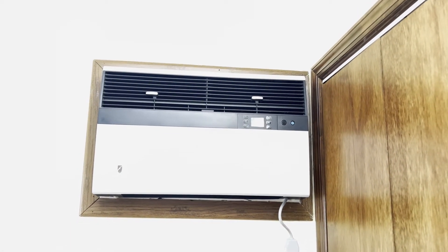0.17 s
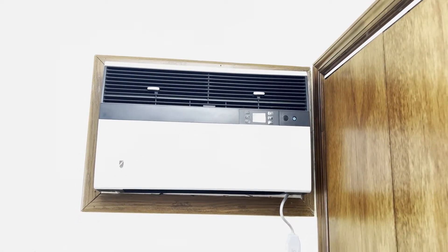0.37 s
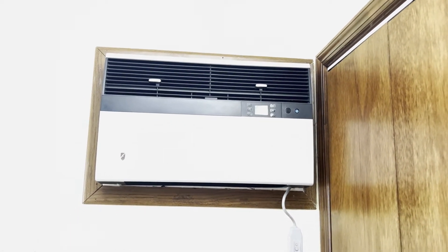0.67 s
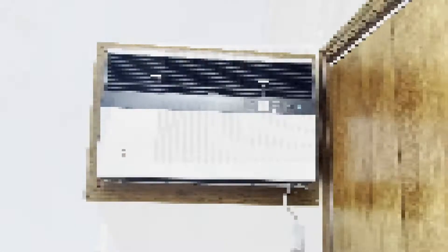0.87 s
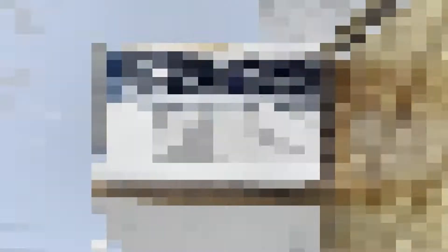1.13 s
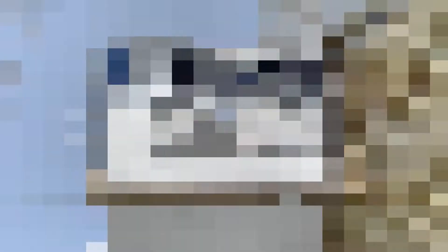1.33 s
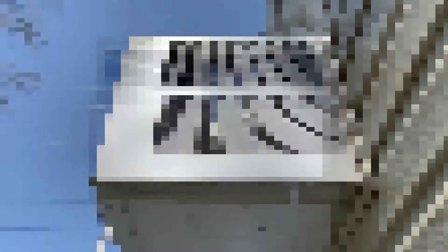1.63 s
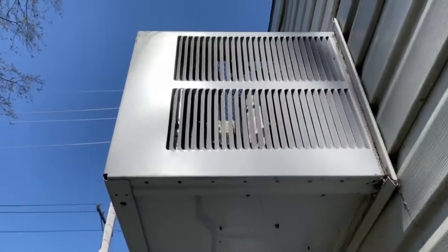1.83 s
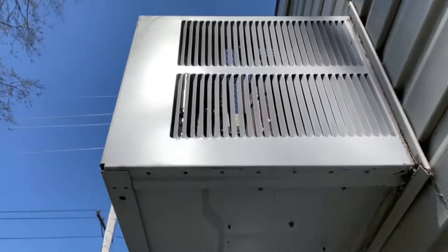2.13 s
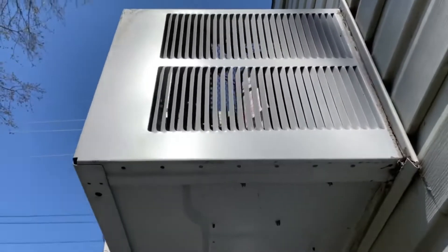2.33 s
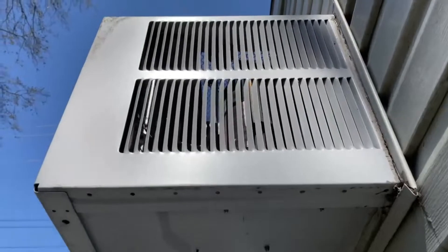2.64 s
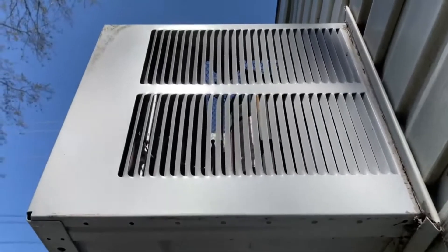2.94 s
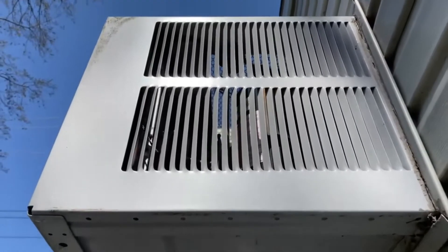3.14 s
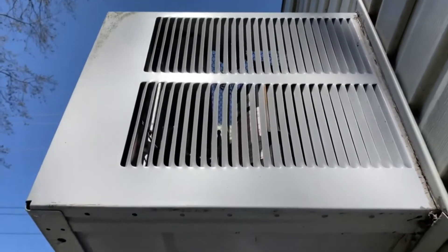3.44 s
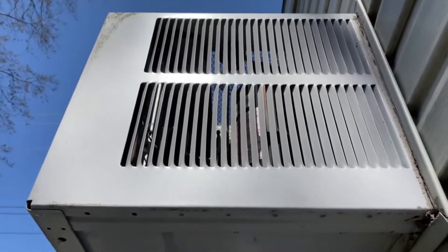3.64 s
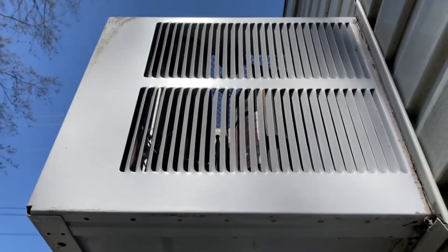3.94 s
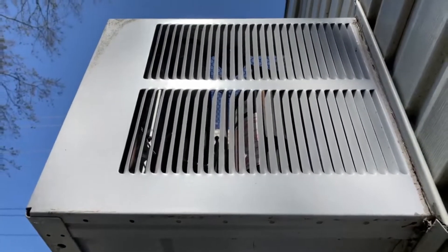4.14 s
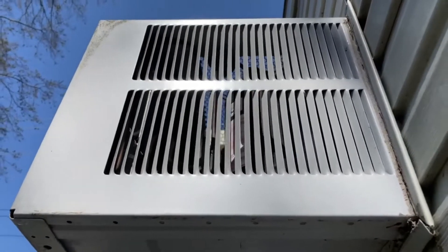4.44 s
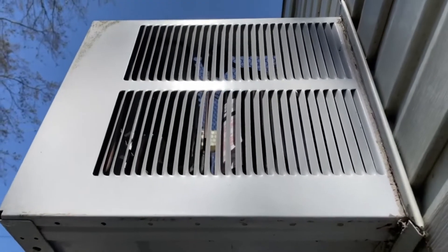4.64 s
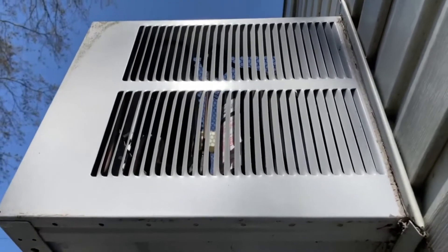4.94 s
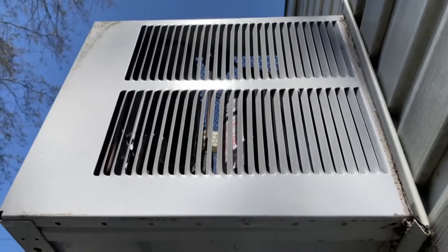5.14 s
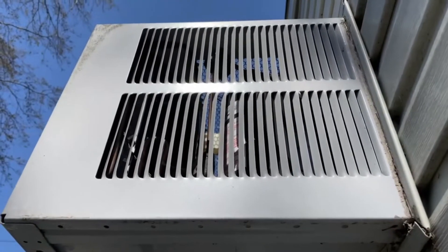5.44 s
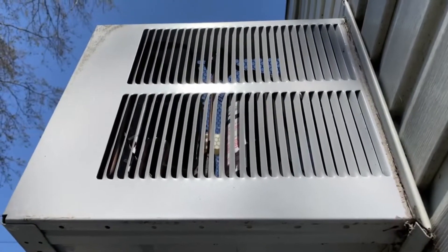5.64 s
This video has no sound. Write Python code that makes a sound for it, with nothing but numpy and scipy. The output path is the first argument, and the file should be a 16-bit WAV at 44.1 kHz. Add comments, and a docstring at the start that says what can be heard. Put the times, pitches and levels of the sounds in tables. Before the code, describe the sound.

Close, wavering air conditioner hum and fan noise fill a small room, fading away by two seconds. Outside, soft traffic and low wind flutter form the background. A near sparrow gives short clusters of bright chirps, a farther one faint cheeps, both reverberant. Grip clicks and low bumps disturb the handheld stereo microphone, with faint high hiss strokes and a passing hollow whoosh late on.

```python
"""A window air conditioner runs in a small room: wavering compressor lines over noise rushing through the grille.
By 1.9 s the room fades into a yard: shaped noise makes distant traffic and light wind buffeting the camera.
A moving hand bumps the camera (sinking mode swings) and ticks on it (noise through casing modes).
Sparrows chirp between metal walls in short trilled pitch glides; faint strokes of high hiss swell and fade.
From about 4.2 s a hollow rush of noise swells and passes."""
import sys
import numpy as np
from scipy import signal
from scipy.fft import rfft, irfft, next_fast_len
from scipy.io import wavfile
from scipy.ndimage import uniform_filter1d, map_coordinates

SR = 44100
rng = np.random.default_rng(int(sys.argv[2]) if len(sys.argv) > 2 else 0)


def master(y):
    """Save y as 16-bit WAV."""
    cut = np.clip(np.atleast_2d(y).T, -1, 1)
    pcm = np.round(cut * 32767)  # scale
    wavfile.write(sys.argv[1], SR, pcm.astype(np.int16))


N = 255780
TOP_HZ = 15650  # band limit of the camera


def amp(db):
    """Decibels to gain."""
    return 10 ** (np.asarray(db) / 20)


def unit(x):
    """Scale to rms 1."""
    return x / np.sqrt(np.mean(x ** 2) + 1e-20)


def along(points, hz):
    """Interpolate (frequency [Hz], value) points on a log frequency axis."""
    f, v = np.transpose(points)
    return np.interp(np.log(hz + 1), np.log(f + 1), v)


def curves(rows):
    """One value per sample for each column after the time."""
    s, *cols = np.transpose(rows)
    return [np.interp(np.arange(N) / SR, s, c) for c in cols]


def half_sine(seconds):
    """A rise and fall from 0 through 1 to 0."""
    return np.sin(np.pi * np.linspace(0, 1, round(seconds * SR)))


def wobble(knots_per_s):
    """A smooth random curve through normal-distributed knots."""
    knots = rng.standard_normal(int(N * knots_per_s / SR) + 4)
    return map_coordinates(knots, [np.arange(N) * knots_per_s / SR])


def filtered(x, response):
    """x times a response of frequency."""
    m = next_fast_len(x.shape[-1] + SR // 4)
    spectrum = rfft(x, m) * response(np.fft.rfftfreq(m, 1 / SR))
    return irfft(spectrum, m)[..., :x.shape[-1]]


def add(track, s, sound):
    """Mix a sound into a track at time s."""
    part = track[..., round(s * SR):][..., :sound.shape[-1]]
    part += sound[..., :part.shape[-1]]


def rush(spectrum, alike, patchy_db):
    """Stereo noise of rms 1 with patches of random gain; alike is the left-right correlation."""
    z = signal.stft(rng.standard_normal((2, N)), nperseg=512)[2]
    field = uniform_filter1d(rng.standard_normal(z.shape[1:]), size=5, axis=0)
    field = uniform_filter1d(field, size=12, axis=1)
    pair = signal.istft(z * amp(patchy_db * unit(field)), nperseg=512)[1][:, :N]

    def mid_side_response(hz):
        turn = np.arccos(np.clip(along(alike, hz), -1, 1)) / 2
        return amp(along(spectrum, hz)) * [np.cos(turn), np.sin(turn)]

    mid, side = filtered(pair, mid_side_response)
    return unit(np.array([mid + side, mid - side]))


def burst(spectrum, seconds):
    """A short noise of rms 1."""
    noise = rng.standard_normal(round(seconds * SR))
    return unit(filtered(noise, lambda hz: amp(along(spectrum, hz))))


def tone(hz, wander_hz):
    """An unsteady line of rms 1; its phase differs more between the ports the higher it is, up to a cap."""
    phase = 2 * np.pi * np.cumsum(hz + wander_hz * wobble(12)) / SR
    skew_rad = min(hz / 1400, .7)
    return np.sqrt(2) * np.sin(phase + np.array([[skew_rad], [-skew_rad]]))


def reverb(x, t60_s, wet_db, build_s):
    """The sound plus a fresh decaying stereo tail that builds up from clumped wall reflections."""
    t = np.arange(SR // 2) / SR
    clumps = amp(2.5 * wobble(130)[:len(t)])
    envelope = amp(-60 * t / t60_s) * (1 - np.exp(-(t / build_s) ** 2))
    tail = rng.standard_normal((2, len(t))) * clumps * envelope
    response = amp(wet_db) * tail / np.linalg.norm(tail[0])
    response[:, 0] += 1  # direct sound
    return signal.fftconvolve(np.atleast_2d(x), response, axes=1)


def air_conditioner():
    """Compressor orders and blower tones, unsteady in pitch and level, over the rush through the grille."""
    # compressor and blower lines: (frequency [Hz], relative level [dB], pitch wander [Hz])
    lines = [(59.3, -38, .1), (78.3, -54, 1), (119.6, -43.5, .35), (157, -56, 2), (178.2, -47, .5),
             (213.6, -56, 1), (239, -55.5, 1), (251, -57, 2), (360, -53.5, .7), (709.7, -61.5, 1.5),
             (948, -71.5, 1.5), (1124, -69.5, 1.5), (1229, -72, 2), (1244, -69, 1), (1660, -72.5, 3),
             (1691, -69.5, 3), (1716.6, -66.5, 2.5), (1738, -69, 3), (1782, -73.5, 5), (1835, -76, 3),
             (2140, -77, 8), (2207, -75.5, 4), (2548.9, -72.5, .7)]
    # grille rush spectrum: (frequency [Hz], relative density [dB])
    blower = [(20, -29), (45, 0), (90, -5.5), (135, -3.5), (160, -1), (250, -3), (310, -5), (500, -7),
              (690, -7.5), (745, -18.5), (820, -13), (1200, -19), (1650, -17.5), (1950, -25.5),
              (2180, -21.5), (2550, -29.5), (2800, -32.5), (6000, -36.5), (9000, -46.5), (12500, -44.5),
              (15600, -45.5)]
    # left-right likeness of the rush: (frequency [Hz], correlation [-1 to 1])
    room_alike = [(60, 0.87), (130, 0.99), (290, 0.41), (640, 0.37), (1410, 0.1), (3100, 0.2),
                  (6820, -0.036), (15000, -0.1)]
    # stereo balance: (frequency [Hz], left minus right [dB])
    room_pan = [(60, -2), (200, -1), (700, 0.5), (1300, 3.5), (4400, 5.5), (8000, 3), (15000, -2)]
    hum = amp(-0.5) * sum(amp(db + 0.49 * wobble(1.3)) * tone(hz, wander_hz) for hz, db, wander_hz in lines)
    surge_db = .6 * wobble(11)
    air = amp(-43.0 + surge_db) * rush(blower, room_alike, patchy_db=1.47)
    return filtered(hum + air, lambda hz: amp(along(room_pan, hz) * np.array([[.5], [-.5]])))


def traffic():
    """Distant noise wash, a finely flickering mid-band noise and a thin far whine; a hollow rush passes."""
    # wash and flickering noise: (time [s], relative level [dB])
    traffic_level = [(1.8, -59.5), (2.27, -58), (2.55, -59), (2.8, -57.5), (3.26, -56), (3.65, -59),
                     (4.05, -59), (4.29, -57.5), (4.6, -53.5), (4.9, -55.5), (5.4, -57), (5.8, -57.5)]
    # wash spectrum: (frequency [Hz], relative density [dB])
    yard = [(25, -13.5), (70, -9), (200, -15.5), (300, -12), (560, -13.5), (800, -11.5), (1300, -16.5),
            (2000, -25.5), (3300, -37), (5700, -49.5), (11000, -57), (15000, -68)]
    # left-right likeness of wash and flickering noise: (frequency [Hz], correlation [-1 to 1])
    yard_alike = [(100, 1), (300, 0.78), (600, -0.52), (1200, -0.2), (2500, 0.31), (8000, -0.069)]
    # hollow rush: (time [s], relative level [dB])
    swell_level = [(4.15, -70), (4.33, -50), (4.47, -49.5), (4.66, -54), (4.85, -52), (5.05, -54.5),
                   (5.3, -61)]
    # hollow rush spectrum: (frequency [Hz], relative density [dB])
    swell_colour = [(300, -32), (600, -5.5), (850, 4), (1200, -0.5), (1600, -12.5), (2200, -3.5),
                    (3200, -42), (6000, -58)]
    # flickering noise spectrum: (frequency [Hz], relative density [dB])
    flicker_colour = [(300, -30), (700, 7), (1400, -7), (2800, -14), (5000, -31.5)]
    # whine: (time [s], relative level [dB])
    whine_level = [(3.1, -73), (3.25, -58), (3.6, -64.5), (4.15, -70), (4.6, -64), (5.8, -68)]
    level_db = curves(traffic_level)[0]
    wash = amp(level_db + 8) * rush(yard, yard_alike, patchy_db=3.0)
    # nearly opposed at the two ports
    swell = amp(curves(swell_level)[0]) * rush(swell_colour, [(1000, -0.89)], patchy_db=5.0)
    scatter_db = 3.5 * wobble(110)
    flicker = amp(level_db - 3) * unit(amp(scatter_db) * rush(flicker_colour, yard_alike, patchy_db=4))
    whine = amp(curves(whine_level)[0] + 0.39 * wobble(20.0)) * tone(1360.5, wander_hz=1.21)
    return wash + flicker + swell + whine


def wind():
    """Eddies shake the camera: deep buffet and higher flutter, mostly alike at both ports; gusts lift both."""
    # wind: (time [s], relative buffet level [dB], relative flutter level [dB])
    wind_levels = [(1.75, -50.5, -61), (1.95, -50, -54.5), (2.12, -57, -54), (2.25, -54, -73),
                   (2.54, -62, -46), (2.68, -55.5, -44), (3.38, -47, -47.5), (3.89, -57.5, -55),
                   (4.1, -77, -45.5), (4.28, -58, -44), (4.47, -48.5, -41), (4.68, -63, -42.5),
                   (4.88, -47.5, -43), (4.98, -62, -39.5), (5.1, -46.5, -43.5), (5.36, -65, -55),
                   (5.56, -60, -52.5), (5.75, -48, -48)]
    # buffet spectrum: (frequency [Hz], relative density [dB])
    buffet_colour = [(18, -44), (35, -18.5), (55, 5), (85, 3.5), (130, -5), (300, -53.5)]
    # flutter spectrum: (frequency [Hz], relative density [dB])
    flutter_colour = [(60, -10), (110, 2), (185, -0.5), (300, -11.5), (450, -21), (900, -37.5),
                      (2000, -103)]
    # short gusts: (time [s], length [s], peak boost [dB])
    gusts = [(2.116, 0.19, 8.5), (2.73, 0.13, 4), (4.977, 0.12, 6)]
    buffet_db, flutter_db = curves(wind_levels)
    gust_db = np.zeros(N)
    for s, length_s, db in gusts:
        add(gust_db, s, db * half_sine(length_s))
    buffet = amp(0.51 * wobble(22)) * rush(buffet_colour, [(60, 0.71)], patchy_db=0.5)
    flutter = amp(2.3 * wobble(30)) * rush(flutter_colour, [(150, 0.96)], patchy_db=2.5)
    return amp(gust_db) * (amp(buffet_db + 3.5) * buffet + amp(flutter_db + 0.7) * flutter)


def bumps():
    """Each bump rubs the camera body and swings its modes, sinking in pitch; hard ones favour high modes."""
    # bumps: (time [s], relative level [dB], length [s], hardness [dB per octave])
    bump_rows = [(1.349, -45, 0.024, -14), (1.976, -48, 0.024, 10.5), (1.983, -38.5, 0.037, -7),
                 (2.187, -41, 0.028, -8), (2.241, -42, 0.024, -12), (2.283, -41.5, 0.03, -11),
                 (2.532, -43.5, 0.04, -1), (2.594, -40, 0.031, -12.5), (2.87, -42.5, 0.034, 4),
                 (3.075, -37, 0.038, -1.5), (3.125, -41, 0.021, -1), (3.164, -43.5, 0.025, 9),
                 (3.243, -31, 0.0453, 0), (3.269, -31, 0.038, -2), (5.024, -25, 0.037, -1),
                 (5.061, -47, 0.046, -5), (5.656, -34, 0.031, -3.5), (5.723, -38, 0.035, -11),
                 (5.781, -34, 0.038, 1)]
    # body modes: (centre frequency [Hz], relative level [dB], share of the bump's length)
    body = [(64.1, -4.5, 1.3), (117.3, -0.5, 0.62), (202, -3.5, 0.846), (333.4, -10, 0.584),
            (590, -24, 0.16)]
    # rub spectrum: (frequency [Hz], relative density [dB])
    thud = [(100, -4), (280, 9), (480, 0), (700, -15), (1500, -53), (4000, -80)]
    rub_db, sag_octaves = -17, 0.82
    pivot_hz = body[1][0]
    track = np.zeros(N)
    for s, db, length_s, hardness in bump_rows:
        rub = burst(thud, length_s)
        add(track, s, amp(db + rub_db + hardness) * rub * half_sine(length_s))
        for hz, mode_db, share in body:
            swing = half_sine(length_s * share)
            u = np.linspace(0, 1, len(swing))
            phase = 2 * np.pi * np.cumsum(hz * 2 ** (sag_octaves * (.5 - u))) / SR
            gain = amp(db + mode_db + hardness * np.log2(hz / pivot_hz))
            add(track, s, gain * swing * np.sin(phase))
    return track


def whistle(glide_hz, rough, octave_db, lead_rad):
    """One note along a pitch glide; a fast trill of the syrinx shakes its pitch and pulses its level."""
    # overtones against the fundamental: (frequency [Hz], relative level [dB])
    overtones = [(3000, -21), (5500, -17), (7300, -20), (9000, -28), (11000, -28), (14000, -39)]
    buzz_hz, warble = 390, .125  # mean trill rate; pitch shake as a share of the pitch
    u = np.linspace(0, 1, len(glide_hz))

    def flutter(knots_per_s):
        return map_coordinates(rng.standard_normal(SR // 10), [np.arange(len(u)) * knots_per_s / SR])

    rasp, shimmer = flutter(1054), flutter(387)
    trill = 2 * np.pi * np.cumsum(buzz_hz * (1 + 0.2 * flutter(150))) / SR
    shake = rough * np.sin(trill) + (.05 + .5 * rough) * rasp  # regular plus irregular
    phase = 2 * np.pi * np.cumsum(glide_hz * (1 + warble * shake)) / SR
    phase = phase + lead_rad * np.array([[.5], [-.5]])
    pulses = 1 + min(rough, 1) * np.cos(trill)
    shimmer_db = 3.3 * np.sqrt(rough) * shimmer
    swell = unit(np.sqrt(np.abs(np.sin(np.pi * u))) * pulses * amp(shimmer_db))

    def overtone(k):  # hoarser than the fundamental
        hz = k * glide_hz
        return amp(along(overtones, hz)) * (hz < TOP_HZ) * np.sin(k * (phase + rough * rasp))

    hiss_colour = [(5000, -25), (6500, 6), (8000, -3), (11300, 1.5), (13000, -18)]
    hiss = amp(-25.5) * burst(hiss_colour, len(u) / SR)  # airy edge
    note = swell * (np.sin(phase) + amp(octave_db) * overtone(2) + overtone(3) + hiss)
    return reverb(note, t60_s=.42, wet_db=-2.2, build_s=.016)


def sparrows():
    """One bird chirps in quick bent syllables, a farther one cheeps and pips; metal walls echo both."""
    # near sparrow's syllables: (time [s], length [s], start [Hz], middle [Hz], end [Hz],
    # relative level [dB], roughness [0-1], second-harmonic boost [dB])
    chirp_notes = [(1.598, 0.024, 4370, 4800, 5100, -64, 0.65, -4),
                   (1.618, .03, 3340, 3960, 3950, -60, 0.4, -2),
                   (1.637, 0.02, 3880, 3720, 3350, -54, 0.5, -2),
                   (1.659, 0.029, 3450, 3233, 2830, -50.5, .6, -7),
                   (2.534, .04, 4900, 5460, 5500, -63, 0.54, 11),
                   (2.556, 0.026, 3390, 3780, 3950, -58, 0.25, 4),
                   (2.577, 0.03, 4040, 4020, 3600, -53.5, .5, 5),
                   (2.61, 0.056, 3230, 2950, 2920, -57, 0.47, 2),
                   (3.299, 0.033, 4580, 5150, 5570, -55.5, 0.4, -4),
                   (3.318, 0.04, 4220, 4050, 3680, -50.5, 0.2, 0),
                   (3.375, 0.035, 3920, 3780, 3550, -48.5, 0.26, -6),
                   (3.401, .029, 3550, 3320, 3100, -53.5, 0.53, -12),
                   (3.908, .032, 4930, 4610, 4520, -52.5, 0.14, 8),
                   (3.941, 0.031, 4370, 4070, 3500, -49, 0.17, 5),
                   (3.972, 0.029, 4840, 4300, 3600, -45, 0, -5),
                   (3.999, 0.026, 3200, 2520, 2070, -54.5, 0.37, -13),
                   (4.034, 0.049, 4040, 3420, 2750, -60, .2, -14),
                   (4.371, .03, 3970, 4600, 5470, -58.5, 0.65, 10),
                   (4.372, 0.064, 6650, 6770, 7570, -63.5, .4, -8),
                   (4.394, 0.027, 3420, 3720, 3900, -53.5, 0.36, 3),
                   (4.415, 0.025, 3874, 3790, 3510, -45, 0.57, -1),
                   (4.444, .036, 3160, 2990, 2640, -46, 0.52, -5),
                   (5.116, 0.035, 4960, 5570, 5330, -63.5, 0.3, 4),
                   (5.147, 0.039, 5210, 4640, 4280, -63.5, .4, 4),
                   (5.176, 0.04, 4410, 4050, 3900, -56.5, 0.38, 8),
                   (5.193, 0.04, 3930, 3130, 2240, -56, 0.48, 2),
                   (5.538, 0.023, 6350, 6400, 6700, -64, 0.3, -6),
                   (5.56, 0.022, 5420, 6620, 7100, -57.5, 0.36, -6),
                   (5.59, 0.014, 6700, 6550, 6400, -56.5, 0.04, -6),
                   (5.599, 0.029, 5970, 5900, 5500, -59, 0.4, -2),
                   (5.58, 0.026, 3440, 3930, 3400, -52.5, .6, -3),
                   (5.6, 0.035, 3400, 2984, 2530, -49.5, 0.4, -4)]
    # farther sparrow's falling cheeps and short pips: columns as above
    cheep_notes = [(2.059, 0.03, 4060, 3800, 3500, -68, 0.35, 13),
                   (2.108, 0.033, 5170, 5000, 4850, -64, .29, -2),
                   (2.99, 0.049, 4580, 4040, 3740, -66, 0.26, 5),
                   (3.635, 0.04, 4100, 3580, 3000, -66, 0.53, 10),
                   (3.696, 0.023, 4660, 4450, 4380, -60, 0.11, -7),
                   (4.753, 0.054, 4140, 3610, 3030, -61.5, 0.45, 16),
                   (4.82, 0.018, 3230, 3170, 3200, -59, .1, 2),
                   (4.835, 0.022, 4850, 4740, 4600, -63, .15, -6)]
    # direction of the birds: (time [s], phase lead of the left port [rad])
    bearing = [(4.1, 0.6), (4.35, -0.1), (5.6, -0.6)]
    # wall echoes: (delay [s], relative level [dB])
    walls = [(.013, -11), (.031, -31.5)]
    track = np.zeros((2, N))
    for s, length_s, start_hz, middle_hz, end_hz, db, rough, octave_db in chirp_notes + cheep_notes:
        arch = np.polyfit([0, .5, 1], [start_hz, middle_hz, end_hz], 2)
        glide_hz = np.polyval(arch, np.linspace(0, 1, round(length_s * SR)))
        lead_rad = np.interp(s, *np.transpose(bearing))
        add(track, s, amp(db) * whistle(glide_hz, rough, octave_db, lead_rad))

    def echoes(hz):
        return 1 + sum(amp(db) * np.exp(-2j * np.pi * hz * delay_s) for delay_s, db in walls)

    return filtered(track, echoes) * amp([[.8], [-.8]])


def hiss_strokes():
    """Short, faint strokes of high hiss swell and fade: shaped noise under half-sine envelopes."""
    # strokes: (time [s], length [s], relative level [dB])
    strokes = [(1.972, 0.093, -64), (2.108, 0.34, -64.5), (2.787, 0.3, -66.5), (3, 0.24, -68),
               (5.29, 0.075, -69), (5.715, .067, -74.5)]
    # hiss spectrum: (frequency [Hz], relative density [dB])
    stroke_colour = [(3000, 7.5), (5500, 4.5), (7200, -2), (9000, -3), (11200, -9), (13000, -2)]
    envelope = np.zeros(N)
    for s, length_s, db in strokes:
        add(envelope, s, amp(db) * half_sine(length_s))
    return envelope * rush(stroke_colour, [(7000, 0.63)], patchy_db=2)


def ticks():
    """Clusters of hard slips of the grip ring the casing, pitched by where it is touched, with a bright edge."""
    # ticks: (time [s], relative level [dB], bright edge [dB], rise [s], knock [Hz], casing ring [dB])
    tick_rows = [(1.978, -37.5, -36, 0.001, 700, 17), (2.081, -40, -28, 0.0042, 850, 21),
                 (2.16, -31.3, -22, .004, 1580, 11), (2.264, -38, -6.5, .0075, 1220, 3),
                 (2.361, -39.5, -24, .0055, 1500, 7), (2.891, -38.5, -9, .0032, 1000, 6),
                 (3.049, -35.7, -15, .0022, 2050, 16), (2.845, -45, -19, 0.0059, 1700, -2),
                 (3.075, -52, -6, .002, 2400, 6), (3.459, -53.5, 10, 0.002, 1700, 6),
                 (3.831, -48.5, -7, 0.0057, 1700, 4), (3.901, -39, 5.5, 0.005, 1300, 6),
                 (4.312, -40.5, -19, 0.0013, 3400, 20), (4.522, -48, 8.5, 0.0019, 1700, 3),
                 (4.546, -42, -11, 0.0059, 1700, 0), (4.573, -42.5, -19, .0041, 1700, 3),
                 (5.273, -46, -14, 0.0029, 2000, 3)]
    # casing modes: (ratio to the knock pitch, relative level [dB])
    casing_modes = [(1, 0), (2.3, -4)]
    knock_q, crackle_db, slips_per_s = 5, 4, 900
    knock_colour = [(300, -12), (900, 8), (1700, 1.5), (3500, -4), (7000, -11.5), (12000, -46)]
    edge_colour = [(1500, -1.0), (4200, 8), (5800, -1.0), (7500, 8), (11300, 6), (13000, -22)]
    track, t = np.zeros((2, N)), np.arange(SR // 20) / SR
    for s, db, bright_db, rise_s, knock_hz, ring_db in tick_rows:
        swell = (t / rise_s * np.exp(1 - t / rise_s)) ** 1.4
        force = swell * amp(crackle_db * wobble(slips_per_s)[:len(t)])
        slips = force * rng.standard_normal((2, len(t)))

        def casing(hz):
            response = 1
            for ratio, mode_db in casing_modes:
                mode_hz = ratio * knock_hz
                detune = hz / mode_hz - mode_hz / (hz + 1)
                response = response + amp(ring_db + mode_db) / (1 + 1j * knock_q * detune)
            return response

        knock = filtered(slips[0], lambda hz: casing(hz) * amp(along(knock_colour, hz)))
        edge = filtered(slips[1], lambda hz: amp(along(edge_colour, hz)))
        level = amp(db - 15.5) * np.sqrt(np.mean(swell ** 2))
        scrape = level * (unit(knock) + amp(bright_db) * unit(edge))
        add(track, s, reverb(scrape, t60_s=.07, wet_db=-8, build_s=.003))
    return track * amp([[1.2], [-1.2]])


def scene():
    """The room fades out as the yard fades in; bumps, ticks and hiss strokes do not follow the fade."""
    # crossfade: (time [s], room gain [dB], yard gain [dB])
    fade = [(0, 1, -46), (.9, 0.5, -32), (1.15, -2, -35), (1.4, -6.5, -7), (1.6, -10, -6.5),
            (1.75, -15.5, -2), (1.9, -45, -2.5)]
    # colour of the outdoor sound, mostly its treble: (frequency [Hz], gain [dB])
    port = [(4500, 0.5), (5700, -3.5), (7400, 0.5), (8600, -12), (9400, -17), (10200, -6), (11400, -3),
            (12300, -23), (15000, -21)]
    room_db, yard_db = curves(fade)
    yard = amp(yard_db) * (traffic() + wind() + sparrows())
    outdoors = yard + bumps() + ticks() + hiss_strokes()
    return amp(room_db) * air_conditioner() + filtered(outdoors, lambda hz: amp(along(port, hz)))


def record(dry):
    """The camera keeps nothing above its band limit."""
    return filtered(dry, lambda hz: hz < TOP_HZ)


dry = scene()
out = record(dry)
master(out)
```